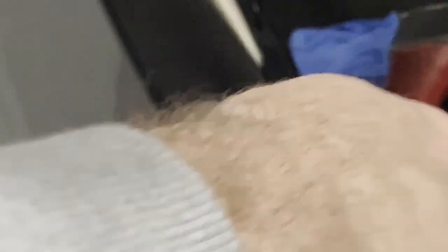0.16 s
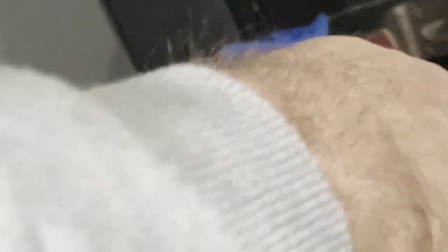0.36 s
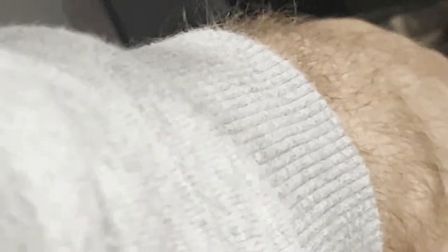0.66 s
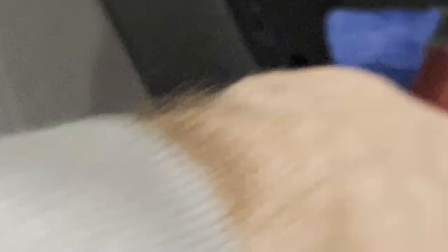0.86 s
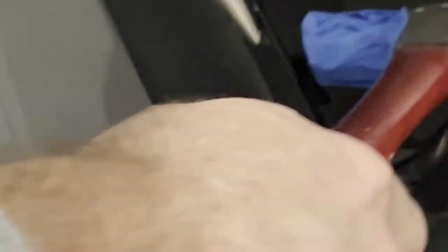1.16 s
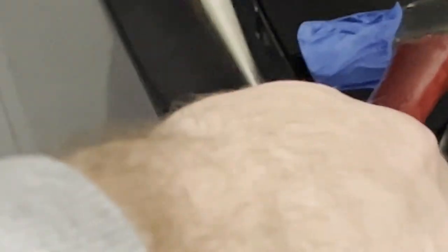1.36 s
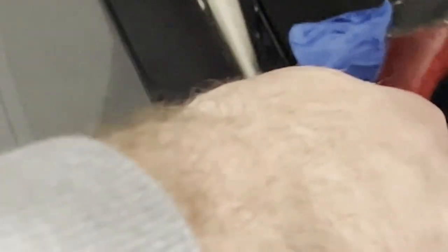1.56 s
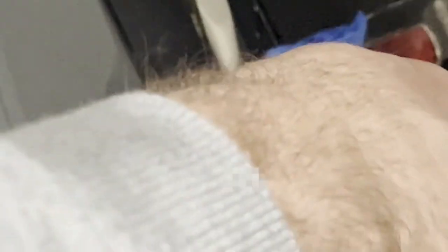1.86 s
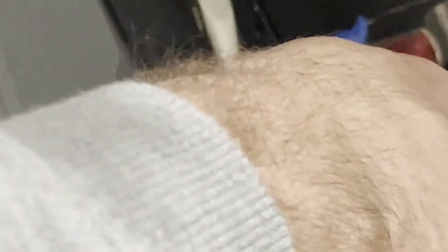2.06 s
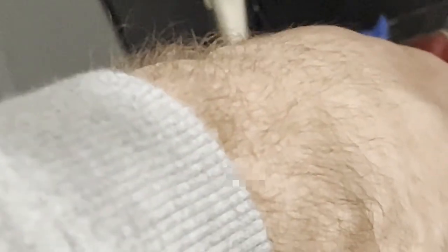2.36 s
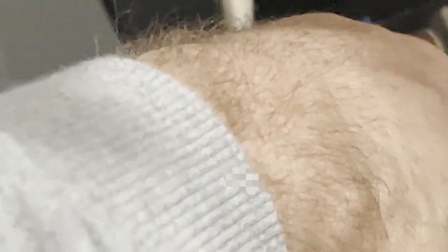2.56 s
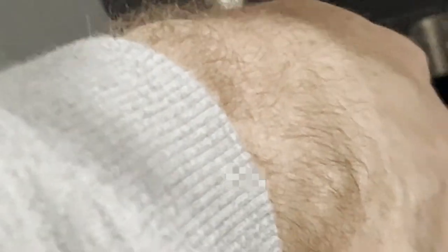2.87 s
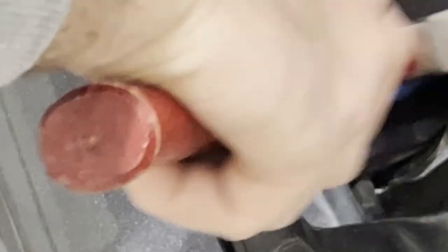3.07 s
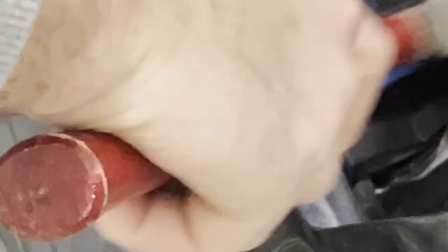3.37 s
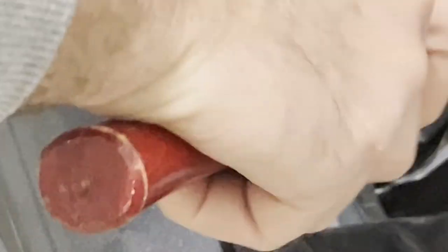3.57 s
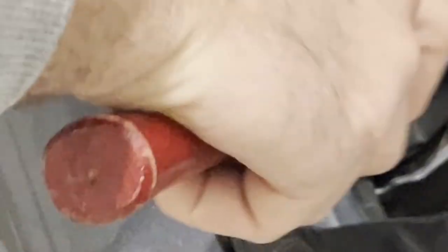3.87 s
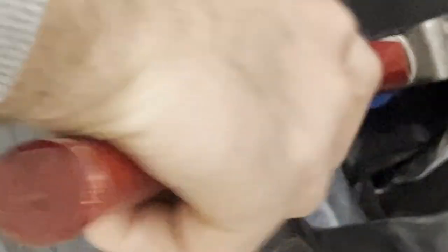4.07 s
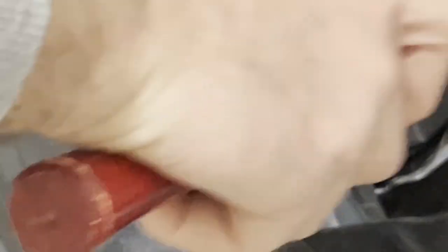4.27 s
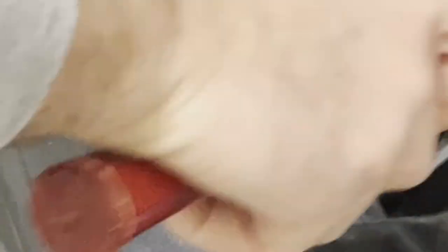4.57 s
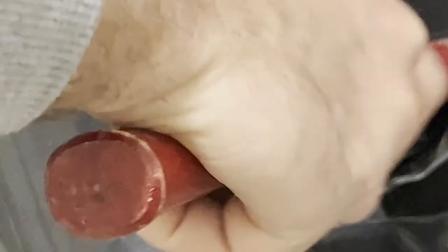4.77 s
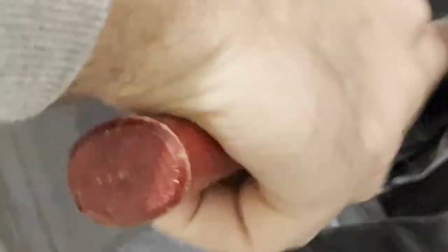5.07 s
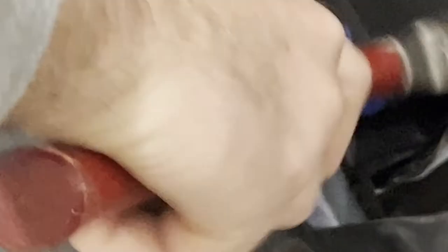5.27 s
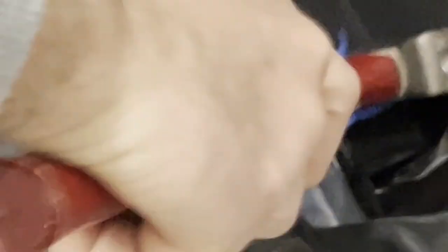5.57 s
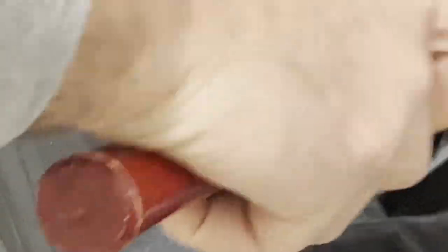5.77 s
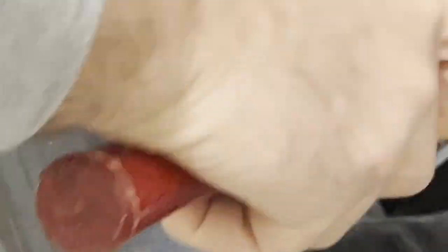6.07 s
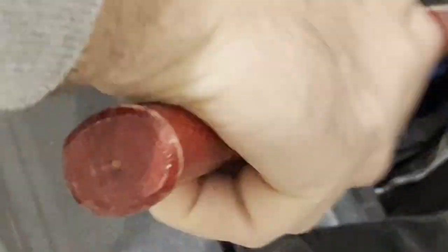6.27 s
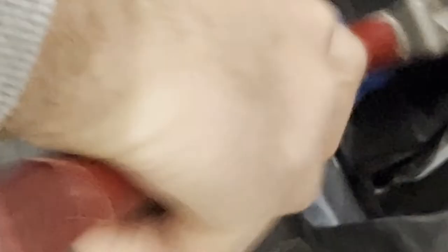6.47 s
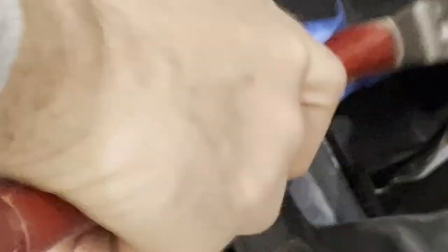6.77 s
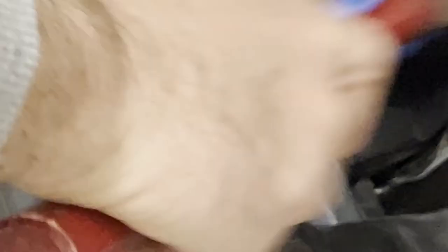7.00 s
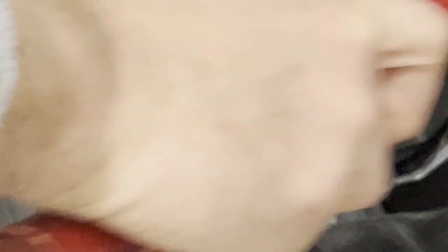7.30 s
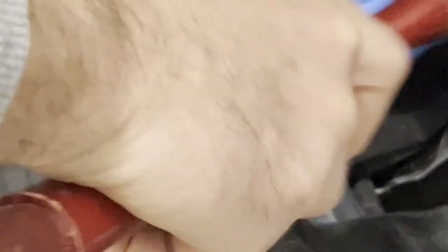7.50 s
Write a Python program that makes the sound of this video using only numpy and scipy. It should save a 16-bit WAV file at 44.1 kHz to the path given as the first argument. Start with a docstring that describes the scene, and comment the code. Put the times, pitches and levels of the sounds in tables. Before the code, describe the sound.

A hammer taps lightly on sheet metal, then lands a steady run of hard, clanging blows, close up in a garage.

```python
"""A small hammer on the metal tab of a car-sized sheet-metal body, heard close up in a garage.
Light scattered taps and fumbling come first, then a steady run of hard blows. Each one cracks steel on
steel, clatters for a moment, rings the panel and fills the room. Hand and tool brush the metal, a few
dry clicks fall near the microphone, and a low rumble and a faint whine lie underneath.
Two close microphone ports pick it up; the sound drops out for an instant before the hard blows."""
import sys
import numpy as np
from scipy import signal
from scipy.fft import rfft, irfft, next_fast_len
from scipy.io import wavfile

SR = 44100
rng = np.random.default_rng(int(sys.argv[2]) if len(sys.argv) > 2 else 0)


def materialize(psi):
    """Save the field psi as 16-bit PCM at rate SR to the path in sys.argv[1].

    A 1-D psi becomes a single channel; in a 2-D psi each row is a channel.
    """
    bounded = np.clip(np.atleast_2d(psi).T, -1, 1)
    quanta = np.round(bounded * 32767).astype(np.int16)
    wavfile.write(sys.argv[1], SR, quanta)


N = 336945

# hammer blows and taps, some landing twice: t/s, level/dB, bass/dB, treble/dB (both re a plain hard blow)
BLOWS = [(0.466, -37, 7, -9.5), (0.7509, -39, 1, -12.5), (0.76, -33, -4.5, -12), (1.7443, -29, 5.5, -9.5),
         (2.53, -29.5, 3, -10), (2.750, -26, 2, 2), (2.760, -32, 6.5, 2), (3.040, -36.5, 6, -2),
         (3.077, -47, 26, -9), (3.374, -5, 0, -10), (3.703, -3.5, 0, -10.5), (4.025, -2, -1.5, -7.5),
         (4.328, -2, -0.5, -4), (4.639, -2, 0, -2), (4.952, -2.5, 0, -2.5), (5.248, -2.5, 0.5, -3),
         (5.535, -3.5, 0, -2.5), (5.835, -3.5, 1.5, -2), (6.136, -12, 0.5, -6), (6.144, -17, -1.5, -4.5),
         (6.452, -2.5, -1, -4.5), (6.738, -2.5, -2.5, -1.5), (7.038, -2.5, -0.5, -6.5),
         (7.387, -2.5, -3, -5), (7.615, -22.5, 12.5, -2)]
# modes of the panel: f/Hz, level/dB, t60/s
PANEL = [(102.9, -25, 0.67), (125.7, -28, 0.28), (150.86, -20.5, 1), (174.4, -3, 0.41), (221.8, 1.5, 0.23),
         (310, -4.5, 0.074), (376.8, -15.5, 0.19), (428.6, -20, 0.16), (499.4, -2, 0.12), (597.2, 3, 0.11),
         (729, 1.5, 0.063), (847, -4, 0.13), (944, -27, 1), (1055, -27, 0.085), (1350, -18, 0.15),
         (1453, -13, 0.5), (1558, -22, 0.22), (1785, -17, 0.2), (1938, -43, 0.84), (2260, -31, 0.21),
         (2587, -37, 0.09), (3036, -19.5, 0.24), (3330, -28, 0.32), (3693, -13.5, 0.12), (4030, -67, 0.17),
         (5150, -55, 0.081), (7550, -101, 0.05)]
# echo of the garage: f/Hz, level/dB re the clatter, t60/s, left-right likeness/0..1
GARAGE = [(60, -17.5, 0.7, 0.92), (154, 3, 0.36, 0.83), (297, -5.5, 0.76, 0.71), (718, -8.5, 0.71, 0.05),
          (1500, -22, 0.95, 0.83), (2160, -21, 0.89, 1), (5160, -19, 0.84, 0.88), (8300, -13.5, 0.65, 1),
          (14000, -16.5, 0.33, 0.99), (16500, -24, 0.33, 0.42)]
LIGHT_TAP_DB = -33   # below this level, a lighter tap changes colour no further


def hits():
    """Hammer blows and soft touches, as arrays of t/s, level/dB, bass/dB, low-mid/dB, treble/dB."""
    # hand and tool touching the panel: t/s, level/dB
    touches = [(0.404, -69), (0.672, -57), (1.256, -63.5), (2.02, -72), (2.06, -58), (2.092, -53.5),
               (2.15, -65), (2.176, -71), (2.268, -66), (2.315, -55), (2.332, -68)]
    touch_tone_db = 11, -0.5, -26   # bass, low-mid, treble
    s, level_db, bass_db, treble_db = np.transpose(BLOWS)
    low_mid_db = -5.5 - 0.15 * np.maximum(level_db, LIGHT_TAP_DB)   # lighter taps gain low-mid
    soft = np.transpose([(*row, *touch_tone_db) for row in touches])
    return np.hstack([[s, level_db, bass_db, low_mid_db, treble_db], soft])


def strength(hz):
    """Gain of every hit at one frequency: its level, tilted by its bass, low-mid and treble."""
    s, level_db, bass_db, low_mid_db, treble_db = hits()
    deep_db = bass_db + 0.15 * np.maximum(level_db, LIGHT_TAP_DB)   # lighter taps lose deep bass
    knots_db = [deep_db, bass_db, low_mid_db, np.zeros_like(s), treble_db]
    place = np.interp(np.log(hz), np.log([150, 300, 650, 1600, 4500]), range(5))
    low = min(int(place), 3)
    return from_db(level_db + knots_db[low] + (place - low) * (knots_db[low + 1] - knots_db[low]))


def contacts(gains, hz, rattle=True):
    """Force of each contact: an abrupt hit, then a rattle that thins out, or else a single impulse."""
    force = np.full(N + SR, 1e-18)
    hit_share = 0.13
    lag_s = 0.01389 * (np.sqrt(100 / min(hz, 2500)) - .2)   # low bending waves arrive late
    s, *_, treble_db = hits()
    rattle_s = np.clip(0.0008 * from_db(-0.3 * treble_db), .001, .012)   # duller blows rattle longer
    for start, length, gain in zip(s, rattle_s, gains):
        at = round((start + lag_s) * SR)
        span = 1 + round(length * SR) if rattle else 1
        shape = np.exp(-3 * np.arange(span) / span)
        force[at:at + span] += gain * (1 - hit_share) * shape / shape.sum()
        force[at] += gain * hit_share
    return force[:N]


def panel_ring():
    """Each hit rings every mode of the sheet metal, with a fresh strength and sign."""
    hit_db = hits()[1]
    freely_db = -0.13 * np.maximum(hit_db, LIGHT_TAP_DB)   # lighter taps let the panel ring more freely
    scatter_db, scatter = 1.5, rng.standard_normal((len(hit_db), len(PANEL), 2))
    out = 0
    for k, (hz, level_db, t60) in enumerate(PANEL):
        gains = strength(hz) * from_db(freely_db + level_db + scatter_db * scatter[:, k, 0])
        force = contacts(gains * np.sign(scatter[:, k, 1]), hz, rattle=False)
        r, w = fade(t60), 2 * np.pi * hz / SR
        out = out + signal.lfilter([0, np.sin(w)], [1, -2 * r * np.cos(w), r * r], force)
    return from_db(-12) * out


def clatter():
    """Countless dense modes as noise dying band by band, close up and as the garage's diffuse tail."""
    # clatter of hammer, tab and panel: f/Hz, spectral level/dB, t60/s
    spectrum = [(83, -10.5, 0.61), (214, 1, 0.13), (565, 0.5, 0.14), (984, -2, 0.13), (1300, 2, 0.083),
                (2210, -7.5, 0.1), (4000, -11, 0.074), (7220, -9.5, 0.067), (8650, -13.5, 0.13),
                (13400, -13, 0.033), (17100, -17, 0.11)]
    white = rng.standard_normal((2, 3, N))
    scatter_db = 1.2 * rng.standard_normal((hits().shape[1], len(bands())))   # no two blows land alike
    build = np.exp(-1 / (0.00089 * SR))   # the echo builds in about a millisecond
    out = 0
    for k, (hz, sos) in enumerate(bands()[4:]):
        force = contacts(strength(hz) * from_db(scatter_db[:, k]), hz)
        direct = decay(force, at_hz(spectrum, hz, column=2))
        swell = signal.lfilter([1 - build], [1, -build], force)
        tail = from_db(at_hz(GARAGE, hz)) * decay(swell, at_hz(GARAGE, hz, column=2))
        near, mid, side = signal.sosfilt(sos, white[k % 2] * [direct, tail, tail])
        out = out + from_db(at_hz(spectrum, hz)) * (near + garage_spread(mid, side, hz))
    return from_db(1.5) * out


def through_panel(sound):
    """The panel's resonances lift noise narrowly around each mode."""
    peaks = sum(signal.lfilter(*signal.iirpeak(hz, Q=15.6, fs=SR), sound) for hz, *_ in PANEL)
    return sound + from_db(1) * peaks


def crack():
    """Steel on steel at first contact, as bright as the blow."""
    s, level_db, _, treble_db = np.transpose(BLOWS)
    return snaps(s, from_db(level_db + treble_db - 16.5), low_hz=1490, t60=0.025)


def clicks():
    """Dry bright clicks close to the microphone."""
    # clicks: t/s, level/dB
    ticks = [(3.037, -56), (3.048, -54), (3.062, -39), (3.074, -48), (3.080, -50), (3.084, -42),
             (3.155, -56)]
    s, level_db = np.transpose(ticks)
    return snaps(s, from_db(level_db), low_hz=2500, t60=0.031)


def snaps(s, gains, low_hz, t60):
    """Very short bursts of bright noise."""
    impulses = np.full(N, 1e-18)
    impulses[np.round(s * SR).astype(int)] = gains
    return filtered(rng.standard_normal(N) * decay(impulses, t60), low_hz, "high")


def rustle():
    """Soft, slightly grainy friction in two bands; each brush swells, holds and dies."""
    # hand and tool brushing the panel: t/s, hold/s, level/dB
    brushes = [(0.403, 0.48, -84), (1.26, 0.33, -94), (1.997, 0.13, -96), (2.32, .2, -87),
               (3.12, 0.012, -68)]
    attack_s, release_s = 0.013, 0.038
    grains = rng.standard_normal(N) * from_db(4.8 * np.minimum(rng.exponential(1, N), 4))
    friction = filtered(grains, (1200, 2380), "band")
    friction += from_db(-11) * filtered(grains, (3100, 3700), "band")
    t, swell = np.arange(N) / SR, 0
    for s, hold_s, level_db in brushes:
        corners_s = np.cumsum([0, attack_s, hold_s, release_s])
        swell = swell + from_db(level_db) * np.interp(t - s, corners_s, [0, 1, 1, 0])
    return swell * friction / friction.std()


def garage_spread(mid, side, hz):
    """Left and right echo, as alike as the garage makes them at this frequency."""
    alike = at_hz(GARAGE, hz, column=3)
    return np.sqrt((1 + alike) / 2) * mid + np.sqrt((1 - alike) / 2) * side * [[1], [-1]]


def squeak():
    """One faint thin squeak among the early taps."""
    start_s, length_s = 1.25, 0.21
    swell = np.interp(np.arange(N) / SR - start_s, [0, .02, length_s], [0, 1, 0])
    return from_db(-87) * swell * narrow_noise(hz=4150, width_hz=150)


def rumble():
    """An earlier tap's low-mid tail dies away; then low rumble and faint hiss, a bit louder from 2 s."""
    # rumble and hiss: f/Hz, spectral level/dB
    spectrum = [(25, -30), (40, 4.5), (65, 14), (110, 5), (250, -4), (500, -10.5), (1000, -38), (1600, -27),
                (2600, -38), (3400, -35), (4500, -48), (6000, -35), (10000, -53), (13000, -38),
                (15400, -49), (16500, -74)]
    # low-mid bands, first the tap's dying tail, later a lift in the rumble: t/s, level/dB
    low_mid_points = [(0, 17), (.2, -4.5), (1.9, -5), (2.1, 6), (2.5, 6), (3.3, 4.5)]
    low_mid_gain = from_db(np.interp(np.arange(N) / SR, *np.transpose(low_mid_points)))
    out, white = 0, rng.standard_normal((2, 2, N))
    for k, (hz, sos) in enumerate(bands()):
        mid, side = signal.sosfilt(sos, white[k % 2]) * (low_mid_gain if 140 < hz < 900 else 1)
        out = out + from_db(at_hz(spectrum, hz)) * (mid + from_db(-14) * side * [[1], [-1]])
    return from_db(-58.5) * out / out.std()


def whine():
    """A steady, very faint high whine in the background."""
    return from_db(-103) * narrow_noise(hz=13500, width_hz=120)


def narrow_noise(hz, width_hz):
    """Noise through one narrow resonance, rms 1."""
    tone = signal.lfilter(*signal.iirpeak(hz, hz / width_hz, SR), rng.standard_normal(N))
    return tone / tone.std()


def from_db(db):
    """dB to gain."""
    return 10 ** (np.asarray(db) / 20)


def at_hz(table, hz, column=1):
    """A column of a spectral table, read on a log-frequency axis."""
    rows = np.array(table)
    return np.interp(np.log(hz), np.log(rows[:, 0]), rows[:, column])


def bands():
    """Third octaves as pairs of centre frequency and band-pass."""
    edges = 22 * 2 ** np.arange(0, 9.8, 1 / 3)
    return [(np.sqrt(low * high), signal.butter(2, [low, high], "band", fs=SR, output="sos"))
            for low, high in zip(edges, edges[1:])]


def filtered(sound, hz, kind, order=2):
    """A sound through a filter with a flat passband."""
    return signal.sosfilt(signal.butter(order, hz, kind, fs=SR, output="sos"), sound)


def fade(t60):
    """Share of amplitude kept per sample for a decay time."""
    return from_db(-60 / (t60 * SR))


def decay(impulses, t60):
    """Envelope that dies away exponentially after each impulse."""
    return signal.lfilter([1], [1, -fade(t60)], impulses)


def scene():
    """Hammering, its echo and the background at the microphone; the panel radiates no deep bass."""
    work = panel_ring() + crack() + clicks() + through_panel(clatter() + rustle())
    return filtered(work, 75, "high", order=3) + rumble() + whine() + squeak()


def record(dry):
    """Two ports differ in phase and level; the sound drops out once, peaks round off, the top is cut."""
    # phase between the microphone ports: f/Hz, lead of the left/rad
    port_phase = [(0, 0), (2100, 0), (3300, .62), (5000, .42), (5850, -.55), (6700, -.05), (8400, -.95),
                  (9400, -2.75), (10000, -np.pi), (13400, -2 * np.pi), (15600, -8.2)]
    left_db, ceiling, stopband_hz = -.5, 1.05, 16800
    size = next_fast_len(N + SR // 10)
    hz, lead = np.transpose(port_phase)
    turn = np.exp(.5j * np.interp(np.fft.rfftfreq(size, 1 / SR), hz, lead))
    ports = irfft(rfft(dry, size) * [turn, turn.conj()], size)[:, :N]
    ports *= from_db([[left_db / 2], [-left_db / 2]])
    dropout = np.interp(np.arange(N) / SR, [3.020, 3.021, 3.032, 3.059], [1, 0, 0, 1])
    rounded = ceiling * np.tanh(dropout * ports / ceiling)
    return signal.sosfilt(signal.cheby2(12, 60, stopband_hz, fs=SR, output="sos"), rounded)


dry = scene()
out = record(dry)
materialize(out)
```